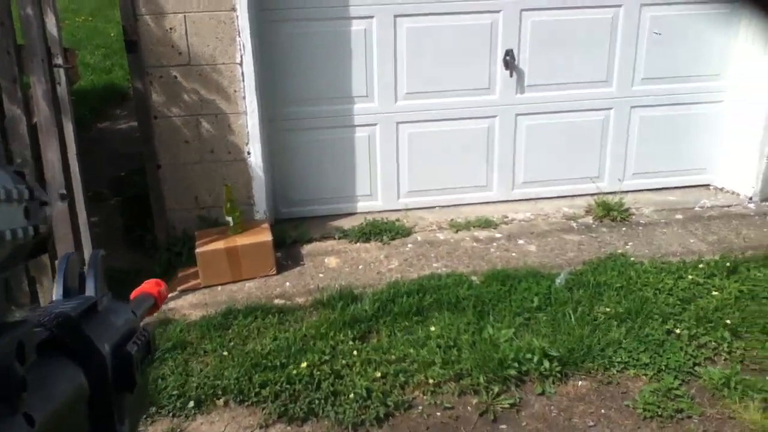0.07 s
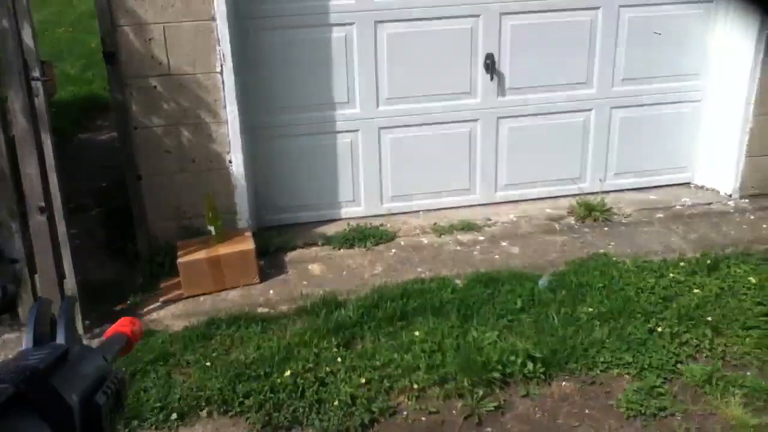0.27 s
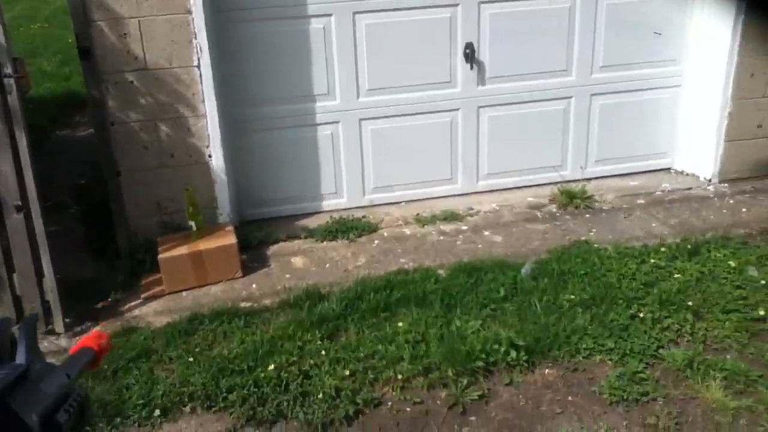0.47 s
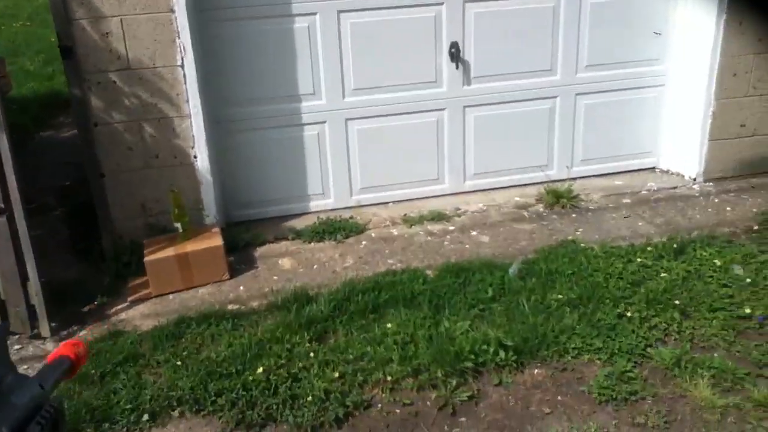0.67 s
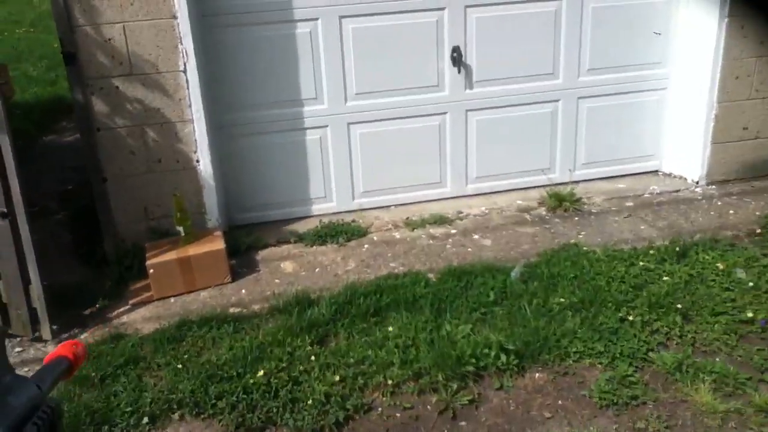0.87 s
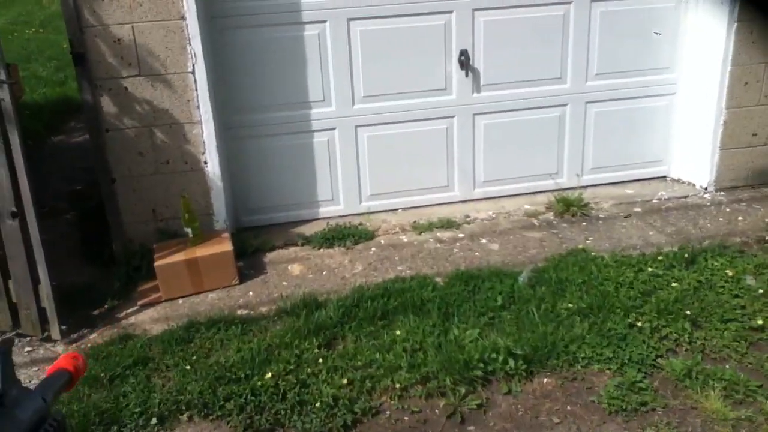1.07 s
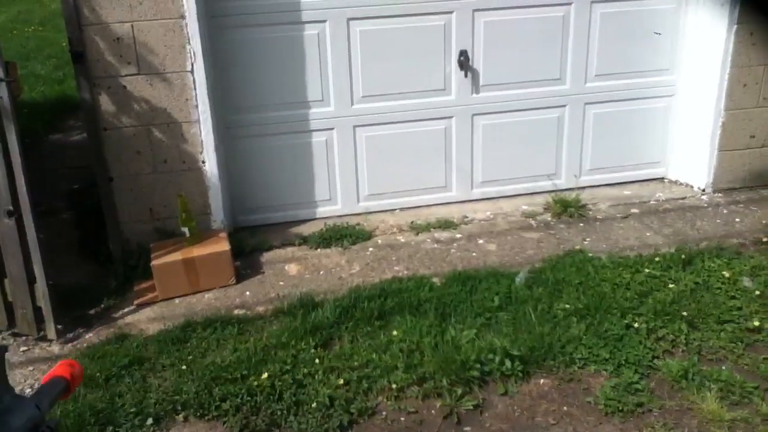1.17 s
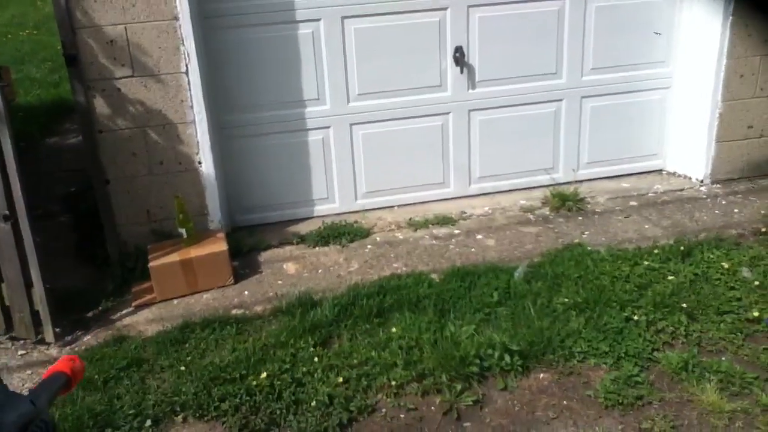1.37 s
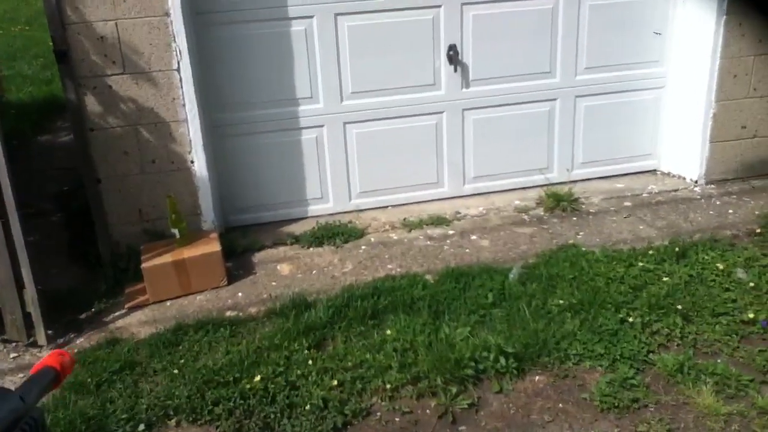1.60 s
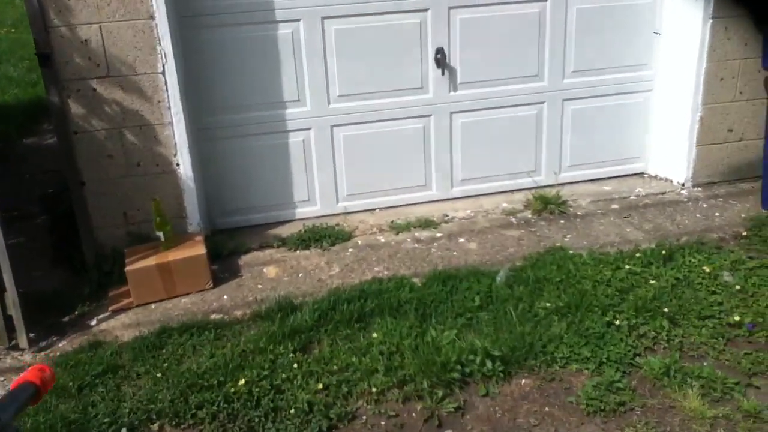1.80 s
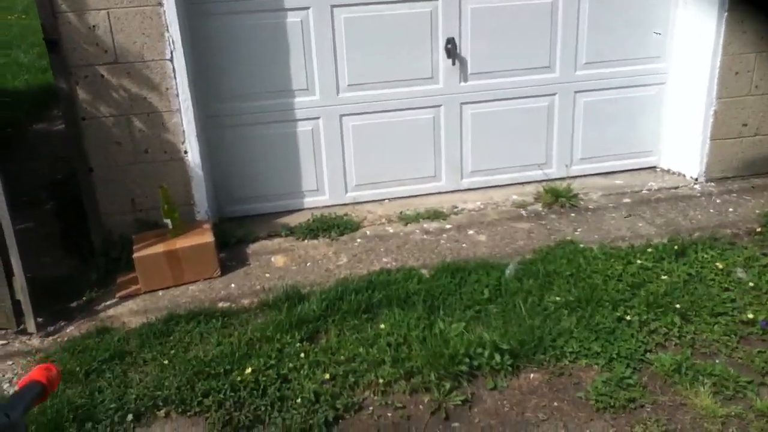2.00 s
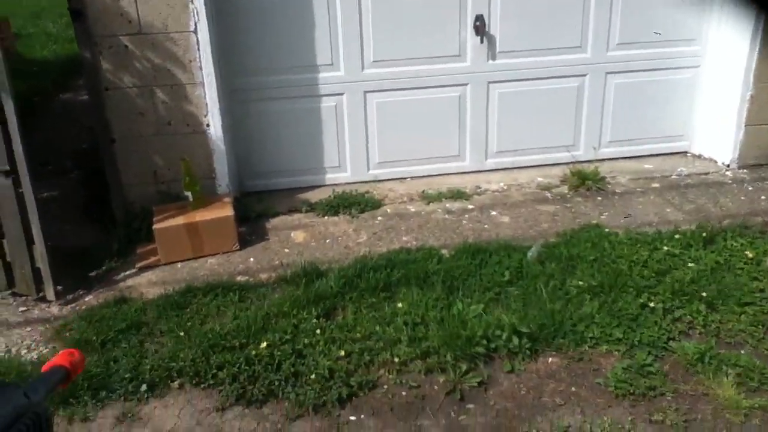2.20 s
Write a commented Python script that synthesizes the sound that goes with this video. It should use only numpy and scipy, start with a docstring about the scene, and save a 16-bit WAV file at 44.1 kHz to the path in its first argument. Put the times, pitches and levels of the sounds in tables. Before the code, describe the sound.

An electric airsoft rifle, close to the microphone, fires two spaced single shots and a rapid pair outdoors; each has a brief motor whine, sharp piston snap and a pellet smacking a cardboard box, with loose pellets rattling afterward.

```python
"""Quiet outdoor air, a rustle and a small clink come first: an electric airsoft rifle is raised in an alley.
It fires two single shots and a two-shot burst at a cardboard box, close to the microphone.
On each pull the motor whines up on gear-mesh tones and the gears grind the spring back in filtered noise.
The piston slams and the pellet hits the box: noise bursts with dying sines. The gearbox clacks as it runs
down, loose pellets rattle in tiny contacts, metal rings on, and sparse reflections answer from the walls."""
import sys
import numpy as np
from scipy import signal
from scipy.fft import rfft, irfft
from scipy.io import wavfile
from scipy.ndimage import uniform_filter1d

SR = 44100
rng = np.random.default_rng(int(sys.argv[2]) if len(sys.argv) > 2 else 0)


def int16_out(signal):
    """Quantize to a 16-bit WAV file."""
    q = np.round(np.clip(np.atleast_2d(signal).T, -1, 1) * 32767)
    wavfile.write(sys.argv[1], SR, q.astype(np.int16))


N = 99225
TIME = np.arange(N) / SR  # s

# Spectra are relative: colour() scales each to unit power gain.
# Background air in the alley. Each row: frequency in Hz, relative level in dB.
AIR_SPECTRUM = [(25, -8.5), (60, -10.5), (105, 0.5), (150, -5.5), (400, -12), (2000, -22), (4000, -31.5),
                (16000, -44)]
AIR_DB = -57.5
# Handling as the rifle is raised and aimed. Each row: centre in seconds, rustle level in dB,
# rumble level in dB, half length in seconds (to 1/e).
HANDLING = [(0.029, -55.5, -45, 0.085), (1.617, -64, -57, 0.0407)]
# Rustle of handling. Each row: frequency in Hz, relative level in dB.
RUSTLE_SPECTRUM = [(300, -1), (1500, -2), (3600, -7), (16000, -22.5)]
# Rumble of handling. Each row: frequency in Hz, relative level in dB.
RUMBLE_SPECTRUM = [(25, -6.5), (90, -3.5), (400, -16.5), (4000, -55.5)]

# Small fitting that clinks as the rifle is raised. Each row: frequency in Hz, level in dB, t60 in seconds.
CLINK_MODES = [(1900, -41.5, .04), (3300, -39, 0.048), (4070, -44, .04), (5440, -48.5, 0.072)]
CLINK_S = .028
MODE_RISE_S = 0.00099  # onset of every struck object

# Decay of the alley walls. Each row: frequency in Hz, t60 in seconds.
ALLEY_DECAY = [(150, .2), (550, 0.27), (1100, 0.27), (12000, 0.17)]
ALLEY_DB = -21.5

# Clacks of trigger, gears and latch. Each row: start in seconds, level in dB, fade in seconds,
# brightness in dB per octave.
CLACKS = [(0.132, -22, 0.0072, -2.5), (0.1441, -19, 0.0051, 0.5), (0.208, -10, 0.0025, 3.5),
          (0.8871, -31, 0.0032, -3), (0.9321, -13, 0.0012, 2.5), (1.1, -10, 0.0019, 3),
          (1.7145, -29, 0.0087, -2.5), (1.78, -14.5, 0.0014, -2.5), (1.841, -16, 0.0012, 1.5),
          (1.8793, -16, 0.0029, 5.5), (1.8832, -11, 0.0016, 1), (2.017, -18, 0.0022, 3.5)]
# Body of a clack, also used for the pellet's crack. Each row: frequency in Hz, relative level in dB.
CLACK_SPECTRUM = [(60, -26.5), (200, -7), (400, -2.5), (520, -15), (760, -0.5), (1200, -4), (2100, 1.5),
                  (5500, -5.5), (10000, -12), (16000, -30)]
CLATTER_DB = 1.5  # unevenness of every blow

# Motor and gears, one table per trigger pull. Each row: time in seconds, gear mesh in Hz,
# whine level in dB before the shell, grinding level in dB.
PULLS = [
    [(.134, 896.5, -20, -51), (.145, 1368, -15, -21), (.157, 1814, -11.5, -14.5), (.173, 2213, -14, -20.5),
     (.207, 2275, -16, -17.5), (.216, 2254, -33.5, -29.5), (.25, 2150, -23, -36),
     (.265, 2086, -26.5, -23.5), (.287, 2250, -53, -32), (.322, 2450, -67, -36.5), (.332, 2131, -30, -27),
     (.361, 1263, -26.5, -35), (.4, 413, -56, -61)],
    [(.893, 803, -32.5, -54), (.902, 1218, -14, -25), (.916, 1740, -16.5, -27), (.93, 1898, -24, -16),
     (.938, 2099, -26, -29), (.965, 2125, -27.5, -33.5), (.994, 2080, -26, -24), (1.014, 2400, -57, -34.5),
     (1.042, 2900, -58.5, -30), (1.052, 2979, -28, -28), (1.075, 2620, -23, -31.5), (1.1, 1922, -40, -23),
     (1.122, 1290, -28.5, -70), (1.148, 514, -95, -68)],
    [(1.72, 805.7, -37.5, -45), (1.728, 1133, -18.5, -27), (1.75, 1857, -18.5, -25),
     (1.767, 1854, -17, -20.5), (1.787, 2079, -30, -18.5), (1.799, 2257, -53, -33),
     (1.828, 2900, -59, -34.5), (1.845, 3000, -23.5, -27.5), (1.872, 2560, -22.5, -28),
     (1.898, 2400, -35, -29), (1.912, 2305, -27.5, -31), (1.93, 2130, -25.5, -30.5),
     (1.944, 2025, -35, -22.5), (1.96, 2178, -58, -35), (1.986, 2415, -59, -36), (1.996, 2221, -41, -28.5),
     (2.026, 1508, -27, -33), (2.07, 450, -48, -49.5)],
]
# Gear-mesh harmonics from the fundamental up. Each entry: relative level in dB.
MESH_DB = [1.5, -0.5, -11.5]
# Scrape of the gears. Each row: frequency in Hz, relative level in dB.
GRIND_SPECTRUM = [(60, -43.5), (220, -16), (480, -12), (750, -3), (1700, -2), (2700, -3), (4800, 0),
                  (6200, -7), (10000, -6.5), (13200, -17.5), (16500, -35)]
# Resonances of the gearbox shell. Each row: frequency in Hz, gain in dB, width in Hz.
SHELL_RESONANCES = [(1320, -4.5, 320), (1774, 6.5, 100), (2234, 3.5, 240), (2970, -11.5, 83),
                    (3593, -6, 320), (4470, -0.5, 1000)]
TEETH, BEVEL_TEETH = 10, 34  # mesh cycles per turn of the shaft and of the bevel gear
WOBBLE_RAD, SPEED_JITTER = .15, .003  # phase swing per shaft turn; speed fraction, rms
ECCENTRIC, FLUTTER, BEVEL_DEPTH = .22, .13, 0.44  # fractions of the whine's amplitude
SLIP_RAD, SLIP_BELOW_HZ = 0.3, 1670  # slow teeth chatter and smear the whine
BACKLASH_RAD, BACKLASH_PER_S = .35, 9  # slip while the speed changes; rate of log speed for full slip
SCRAPE_DEPTH, TOOTH_DEPTH, GRIT_DB = .35, .4, .8  # pulsing of the scrape by shaft, teeth and grit
CHATTER_PER_S, CHATTER_DB, SCRAPE_DB = 600, -7.5, -1  # parts of the grinding

# Piston slams. Each row: start in seconds, level in dB.
SLAMS = [(0.2739, -14), (1.0017, -13), (1.7851, -13.5), (1.9463, -12.5)]
# Body of a slam. Each row: frequency in Hz, relative level in dB.
SLAM_SPECTRUM = [(40, -2), (500, -16.5), (730, 1.5), (1050, -12), (2200, -0.5), (3300, 2.5), (5200, 4.5),
                 (7000, -5.5), (16000, -25)]
SLAM_HOLD_S, SLAM_FADE_S = .0035, .002
# Body modes of the rifle. Each row: frequency in Hz, level in dB, t60 in seconds.
STOCK_MODES = [(222, -32, 0.098), (737.6, -28.5, 0.081)]
# Knock of the freed spring just before the slam. Each row: frequency in Hz, relative level in dB.
RELEASE_SPECTRUM = [(50, -8), (170, 2), (400, 4), (1600, 6.5), (4000, -28), (16000, -33.5)]
RELEASE_LEAD_S, RELEASE_FADE_S = 0.0069, 0.0017
RELEASE_DB = -5.5  # against its slam

# Pellets hitting the box. Each row: start in seconds, crack level in dB, boom level in dB.
IMPACTS = [(0.3245, -21.5, -8.5), (1.0485, -19, -4), (1.8311, -15.5, -3), (1.9885, -18.5, -0.5)]
# Boom of the cardboard box. Each row: frequency in Hz, level in dB added to the boom, t60 in seconds.
BOX_MODES = [(199, -29.5, .05), (349, -23, 0.063), (527, -26, 0.0083), (681, -12.5, 0.02)]
CRACK_FADE_S, CRACK_TILT_DB = 0.0033, 1.5  # tilt per octave

# Spells of fine rattling. Each row: start in seconds, end in seconds, first level in dB, last level in dB;
# the size of each contact and the clumping add to these levels.
RATTLES = [(0.37, 0.76, -56, -79), (1.121, 1.59, -57.5, -54.5), (2.04, 2.311, -44.5, -55)]
# Loose pellets clicking in the magazine. Each row: start in seconds, level in dB.
TICKS = [(.406, -42), (.455, -36.5), (.499, -44), (0.503, -45), (0.511, -47.5), (0.611, -49.5),
         (0.647, -49.5), (1.237, -37.5), (1.284, -40), (1.333, -44), (1.381, -44.5), (1.428, -33.5),
         (1.435, -36), (1.442, -33), (1.451, -38), (1.4875, -35.5), (1.52, -50), (2.177, -41.5)]
# Body of a pellet contact. Each row: frequency in Hz, relative level in dB.
TICK_SPECTRUM = [(700, -10), (3500, -0.5), (6500, 1.5), (10000, -5), (16000, -22)]
TICK_FADE_S, RATTLE_FADE_S, RATTLE_SETTLE_S = .002, .0011, .07
RATTLE_PER_S, RATTLE_CLUMP_DB = 520, 3  # contact rate; clumping, rms
RATTLE_SPREAD_DB, RATTLE_LIMIT = 3.5, 2.4  # mean of the exponential size before its limit; limit in means

# Gears rocking back against their latch as they stop. Each row: start in seconds, level in dB.
KNOCKS = [(0.4165, -25), (.446, -34.5), (.461, -41), (1.154, -31), (1.167, -39), (2.08, -30),
          (2.099, -33.5)]
# Body of a latch knock. Each row: frequency in Hz, relative level in dB.
KNOCK_SPECTRUM = [(120, -21), (450, -3.5), (950, 1.5), (2200, -3.5), (7000, -12), (16000, -38)]
KNOCK_FADE_S = 0.0058

# Blows that set the metal ringing. Each row: start in seconds, level in dB added to the modes.
RINGS = [(1.1, -0.5), (1.885, -2)]
# Ringing metal. Each row: frequency in Hz, level in dB, t60 in seconds.
RING_MODES = [(727, -52.5, 2), (1457, -44.5, 0.62), (2013, -39.5, 1.0)]

LOW_CUT_HZ, EDGE_HZ, CEILING = 100, 15850, .8  # microphone bass cut, band limit, peak ceiling


def amp(db):
    """Decibels to gain."""
    return 10 ** (np.asarray(db) / 20)


def unit(x):
    """Scales to rms 1."""
    return x / np.sqrt(np.mean(x ** 2) + 1e-20)


def read(points, hz):
    """Reads a table on a log-frequency axis."""
    f, value = np.transpose(points)
    return np.interp(np.log(hz + 1), np.log(f), value)


def add(mix, s, sound):
    """Mixes a sound in at time s."""
    part = mix[max(round(s * SR), 0):][:len(sound)]
    part += sound[:len(part)]


def colour(x, points, tilt_db=0):
    """Causal filter of unit power gain with the given spectrum, tilted per octave."""
    hz = abs(np.fft.fftfreq(2048, 1 / SR))
    tilt = tilt_db * np.log2(np.maximum(hz, 300))
    log_gain = np.log(amp(read(points, hz) + tilt))
    # The Hilbert transform of the log gain supplies the minimum phase.
    taps = np.fft.ifft(np.exp(np.conj(signal.hilbert(log_gain)))).real
    return signal.fftconvolve(x, taps / np.linalg.norm(taps))[:len(x)]


def wander(rate_hz):
    """Random motion of rms 1, mostly slower than the given rate."""
    lowpass = np.exp(-(np.fft.rfftfreq(N, 1 / SR) / rate_hz) ** 2)
    return unit(irfft(rfft(rng.standard_normal(N)) * lowpass, N))


def burst(spectrum, fade_s, hold_s=0.00051, tilt_db=0):
    """A blow: a short, uneven clatter of contacts through a hard body."""
    t = TIME[:SR // 8]
    shape = np.exp(-np.maximum(t - hold_s, 0) / max(fade_s, 1e-4))
    slow_noise = unit(uniform_filter1d(rng.standard_normal(len(t)), size=30))
    uneven = amp(CLATTER_DB * np.clip(slow_noise, -2, 2))
    blow = colour(shape * uneven * rng.standard_normal(len(t)), spectrum, tilt_db)
    return blow * np.linalg.norm(shape) / np.linalg.norm(blow)


def modes(table):
    """Dying sines of a struck object, alternating in sign, with a short rise."""
    rise = 1 - np.exp(-TIME / MODE_RISE_S)
    ringing = np.zeros(N)
    for k, (hz, db, t60) in enumerate(table):
        ringing += (-1) ** k * amp(db - 60 * TIME / t60) * np.sin(2 * np.pi * hz * TIME)
    return rise * ringing


def air():
    """Quiet outdoor background as wandering noise, with swells of rustle and rumble from handling."""
    out = amp(AIR_DB + wander(10.0)) * colour(rng.standard_normal(N), AIR_SPECTRUM)
    for s, rustle_db, rumble_db, half_s in HANDLING:
        rustle = amp(rustle_db) * colour(rng.standard_normal(N), RUSTLE_SPECTRUM)
        rumble = amp(rumble_db) * colour(rng.standard_normal(N), RUMBLE_SPECTRUM)
        out += np.exp(-((TIME - s) / half_s) ** 2) * (rustle + rumble)
    return out


def clink():
    """A small fitting, knocked once, rings in a few short high modes."""
    out = np.zeros(N)
    add(out, CLINK_S, modes(CLINK_MODES))
    return out


def alley(x):
    """Sparse wall reflections, from about 8 ms after the direct sound, whose treble dies first."""
    taps = rng.standard_normal(SR) * (rng.random(SR) < 2000 / SR) * (TIME[:SR] > .008)
    hz, t, z = signal.stft(taps, SR, nperseg=256)
    decay = amp(-60 * t / read(ALLEY_DECAY, hz)[:, None])
    tail = signal.istft(z * decay, SR, nperseg=256)[1]
    return signal.fftconvolve(x, tail / np.linalg.norm(tail))[:N]


def clacks():
    """Trigger, gears and latch strike as short bursts, each with its own fade and brightness."""
    out = np.zeros(N)
    for s, db, fade_s, tilt_db in CLACKS:
        add(out, s, amp(db) * burst(CLACK_SPECTRUM, fade_s, hold_s=0.0014, tilt_db=tilt_db))
    return out


def shell(x):
    """The gearbox shell rings at its own pitches, whatever drives it."""
    out = np.zeros(N)
    for k, (hz, db, width) in enumerate(SHELL_RESONANCES):
        out += (-1) ** k * amp(db) * signal.lfilter(*signal.iirpeak(hz, hz / width, fs=SR), x)
    return out


def gearbox(pull):
    """Meshing teeth whine through the shell, wobbling and slipping; chatter and pulsing scrape grind."""
    s, hz, whine_db, grind_db = np.transpose(pull)
    running = np.interp(TIME, [s[0] - .002, s[0], s[-1], s[-1] + 0.011], [0, 1, 1, 0])
    steady_speed = np.interp(TIME, s, hz)
    speed = steady_speed * (1 + SPEED_JITTER * wander(200))
    mesh = 2 * np.pi * np.cumsum(speed) / SR
    shaft, bevel = mesh / TEETH, mesh / BEVEL_TEETH

    # Teeth slip when turning slowly and when the speed changes.
    change = abs(np.gradient(np.log(steady_speed))) * SR
    slow_slip = SLIP_RAD * np.minimum((SLIP_BELOW_HZ / speed) ** 4, 2)
    backlash = BACKLASH_RAD * np.minimum(change / BACKLASH_PER_S, 1)
    phase = mesh + WOBBLE_RAD * np.sin(shaft) + (slow_slip + backlash) * wander(600)

    whine = np.zeros(N)
    for k, db in enumerate(MESH_DB):
        swell = 1 + FLUTTER * wander(250) + BEVEL_DEPTH * np.cos(bevel + k)
        whine += amp(db) * np.sin((k + 1) * phase) * swell
    whine *= 1 + ECCENTRIC * np.cos(2 * shaft)

    contact = (1 + SCRAPE_DEPTH * np.cos(shaft)) * (1 + TOOTH_DEPTH * np.cos(mesh))
    contact *= amp(GRIT_DB * wander(1500))
    scrape = unit(colour(contact * rng.standard_normal(N), GRIND_SPECTRUM))
    clicks = rng.choice([-1, 1], N) * (rng.random(N) < CHATTER_PER_S / SR)
    chatter = unit(shell(clicks))
    grind = amp(CHATTER_DB) * chatter + amp(SCRAPE_DB) * scrape

    shell_whine = shell(whine * amp(np.interp(TIME, s, whine_db)))
    return running * (shell_whine + grind * amp(np.interp(TIME, s, grind_db)))


def piston_slams():
    """The freed spring knocks, the piston slams as a held burst, and the rifle body rings briefly."""
    out = np.zeros(N)
    for s, db in SLAMS:
        add(out, s - RELEASE_LEAD_S, amp(db + RELEASE_DB) * burst(RELEASE_SPECTRUM, RELEASE_FADE_S))
        add(out, s, amp(db) * burst(SLAM_SPECTRUM, SLAM_FADE_S, SLAM_HOLD_S))
        add(out, s + 0.00094, modes(STOCK_MODES))
    return out


def box_impacts():
    """Each pellet cracks against the cardboard, and the box booms in damped modes."""
    out = np.zeros(N)
    for s, crack_db, boom_db in IMPACTS:
        crack = burst(CLACK_SPECTRUM, CRACK_FADE_S, hold_s=0.0011, tilt_db=CRACK_TILT_DB)
        add(out, s, amp(crack_db) * crack)
        add(out, s, amp(boom_db) * modes(BOX_MODES))
    return out


def pellets():
    """Loose pellets click and settle after each shot: many small contacts, a few larger."""
    level = np.zeros(N)
    for start, end, *dbs in RATTLES:
        settling = np.clip((end - TIME) / RATTLE_SETTLE_S, 0, 1)
        level += (TIME > start) * settling * amp(np.interp(TIME, [start, end], dbs))
    level *= amp(RATTLE_CLUMP_DB * wander(40))
    sizes = amp(RATTLE_SPREAD_DB * np.minimum(rng.exponential(1, N), RATTLE_LIMIT))
    contacts = level * sizes * (rng.random(N) < RATTLE_PER_S / SR)
    # Each contact leaves a decaying power; overlapping ones add in power.
    decay = np.exp(-2 / (RATTLE_FADE_S * SR))
    power = signal.lfilter([1], [1, -decay], contacts ** 2 + 1e-20)
    out = colour(np.sqrt(power) * rng.standard_normal(N), TICK_SPECTRUM)
    for s, db in TICKS:
        add(out, s, amp(db) * burst(TICK_SPECTRUM, TICK_FADE_S))
    return out


def latch_knocks():
    """The stopping gears rock back against their latch in dull bursts."""
    out = np.zeros(N)
    for s, db in KNOCKS:
        add(out, s, amp(db) * burst(KNOCK_SPECTRUM, KNOCK_FADE_S))
    return out


def ringing_metal():
    """A struck piece of metal rings on in slowly dying modes."""
    out = np.zeros(N)
    for s, db in RINGS:
        add(out, s, amp(db) * modes(RING_MODES))
    return out


def scene():
    """The rifle close by with the alley around it; the loose pellets are heard without reflections."""
    rifle = clink() + clacks() + sum(gearbox(pull) for pull in PULLS)
    rifle += piston_slams() + box_impacts() + latch_knocks() + ringing_metal()
    return (air() + rifle + amp(ALLEY_DB) * alley(rifle) + pellets())[None]


def record(dry):
    """The microphone thins the bass and rounds off peaks; then the band limit."""
    thin = signal.lfilter(*signal.butter(1, LOW_CUT_HZ, "high", fs=SR), dry)
    rounded = thin / (1 + (thin / CEILING) ** 4) ** (1 / 4)
    band = signal.firwin(511, EDGE_HZ, window=("kaiser", 9), fs=SR)
    return signal.oaconvolve(rounded, band[None], "same")


dry = scene()
out = record(dry)
int16_out(out)
```